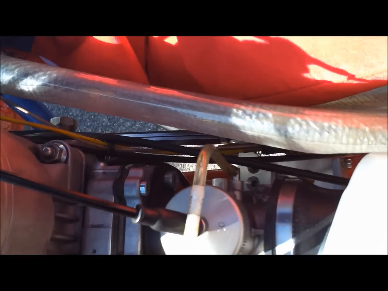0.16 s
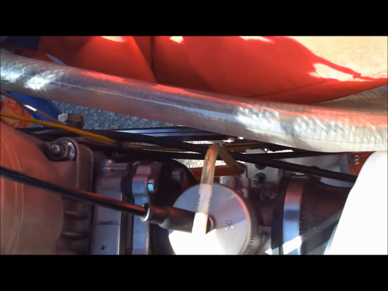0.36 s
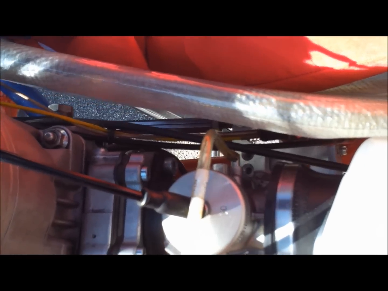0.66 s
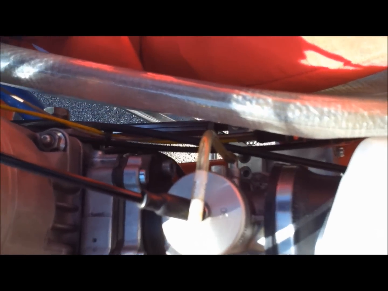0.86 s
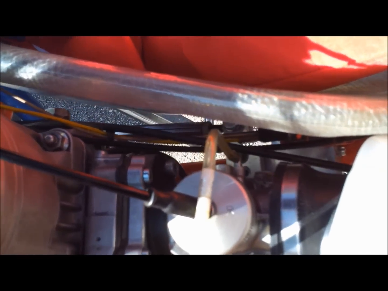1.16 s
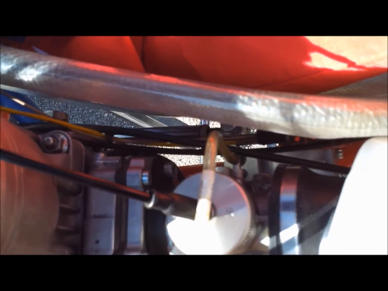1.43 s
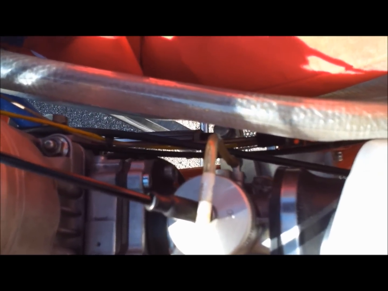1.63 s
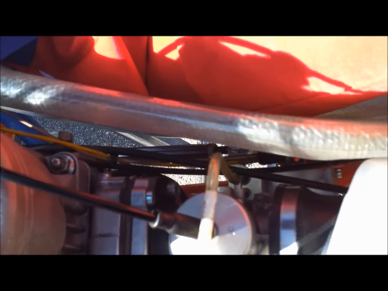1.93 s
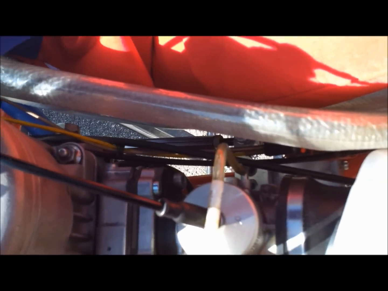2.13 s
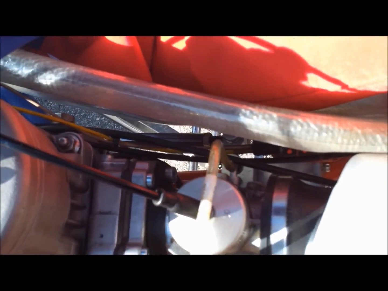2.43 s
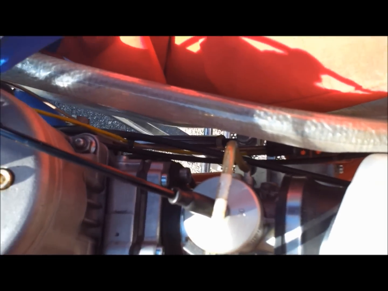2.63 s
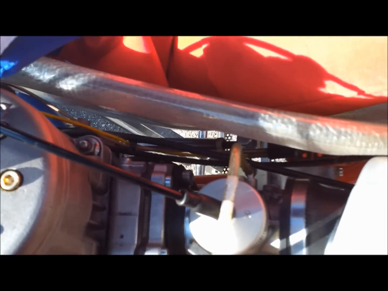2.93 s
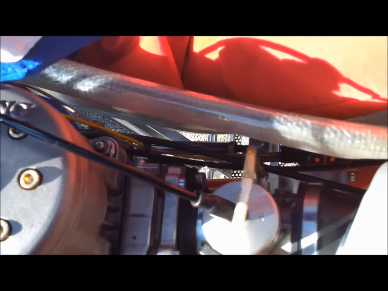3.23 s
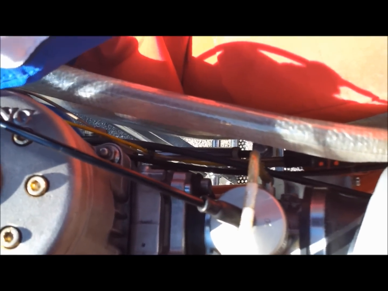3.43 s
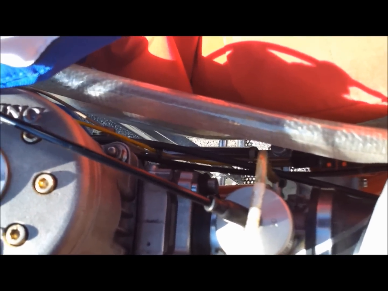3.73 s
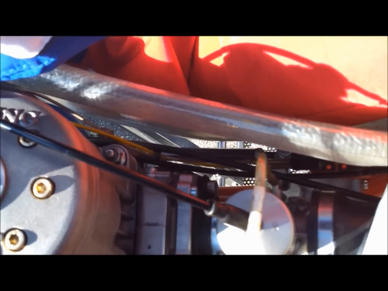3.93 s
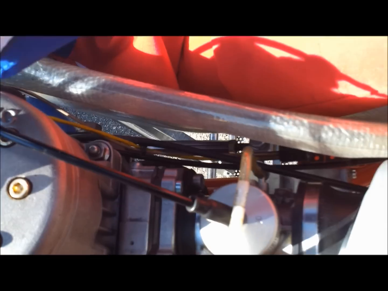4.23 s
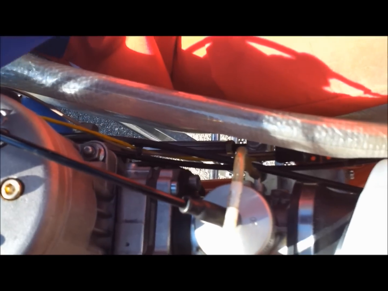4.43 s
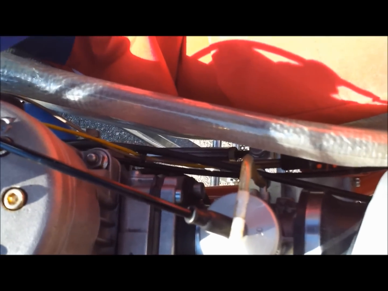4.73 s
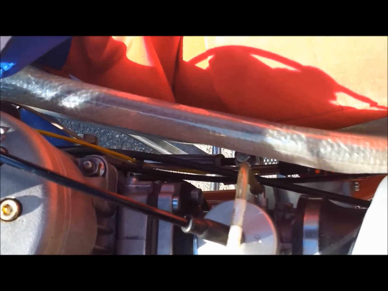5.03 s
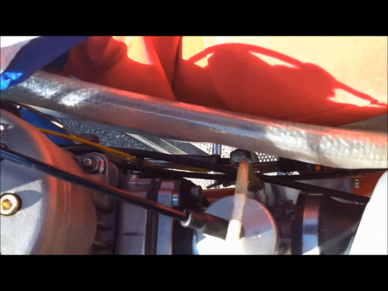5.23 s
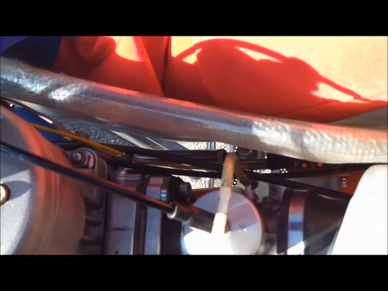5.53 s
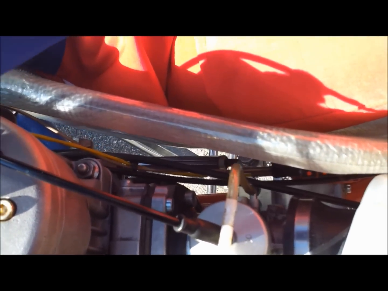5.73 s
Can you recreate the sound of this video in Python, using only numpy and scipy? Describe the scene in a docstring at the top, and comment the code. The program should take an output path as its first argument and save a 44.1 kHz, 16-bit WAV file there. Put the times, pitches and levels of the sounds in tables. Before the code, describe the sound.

With the engine off, a kart's metal shift linkage clacks and thumps, the chain ticks during a short roll, then harder clunks follow.

```python
"""A kart's shift linkage is worked with the engine off: bright metal clacks, made of uneven noise bursts
passed through resonances, some with ringing tones. Blows shake the tube frame into dull thumps.
The kart rolls a little: the chain ticks over its sprocket and the tyres rumble through the frame. A cable
creaks as it sticks and slips. Hiss and low wind lie underneath. All is heard from a microphone fixed to the
frame, and the loudest blows overload its input."""
import sys
import numpy as np
from scipy import signal
from scipy.fft import rfft, irfft
from scipy.io import wavfile
from scipy.ndimage import uniform_filter1d

SR = 44100
rng = np.random.default_rng(int(sys.argv[2]) if len(sys.argv) > 2 else 0)


def waveform_to_disk(signal):
    """Save audio, clipped to [-1, 1], as 16-bit WAV at the path in sys.argv[1]."""
    frames = np.transpose(np.atleast_2d(signal))
    scaled = np.clip(frames, -1, 1) * 32767
    samples = np.round(scaled).astype(np.int16)
    wavfile.write(sys.argv[1], SR, samples)


N = 258867  # length [samples]


def from_db(db):
    """Turn decibels into an amplitude factor."""
    return 10 ** (np.asarray(db) / 20)


def rms_one(x):
    """Scale a signal to an rms of 1."""
    return x / np.sqrt(np.mean(x ** 2) + 1e-20)


def in_time(rows):
    """Draw straight lines between rows; the first column is the time in seconds."""
    s, *columns = np.transpose(rows)
    return [np.interp(np.arange(N) / SR, s, column) for column in columns]


def drift(rate_hz):
    """Smoothed noise with an rms of 1: a random wander, faster at a higher rate."""
    r = np.exp(-2 * np.pi * rate_hz / SR)
    noise = rng.standard_normal(N + SR)
    return rms_one(signal.lfilter([1], [1, -2 * r, r * r], noise)[SR:])  # drop the filter's start


def coloured_noise(spectrum):
    """White noise shaped by a spectrum in dB, with an rms of 1."""
    hz = np.arange(N // 2 + 1) * SR / N + 1
    points = np.array(spectrum)
    shape = from_db(np.interp(np.log(hz), np.log(points[:, 0]), points[:, 1]))
    return rms_one(irfft(rfft(rng.standard_normal(N)) * shape, N))


def ring(x, hz, t60):
    """A unit click sets a sine of height 1 ringing; it falls by 60 dB in t60 seconds."""
    r, w = from_db(-60 / (t60 * SR)), 2 * np.pi * hz / SR
    return signal.lfilter([0, np.sin(w)], [1, -2 * r * np.cos(w), r * r], x + 1e-18)


def resonate(x, peaks):
    """Pass a sound through side-by-side resonances of alternating sign."""
    out = 0
    for k, (hz, width_hz, level_db) in enumerate(peaks):
        r = np.exp(-np.pi * width_hz / SR)
        feedback = [1, -2 * r * np.cos(2 * np.pi * hz / SR), r * r]
        band = signal.lfilter([(1 - r * r) / 2, 0, (r * r - 1) / 2], feedback, x)
        out = out + (-1) ** k * from_db(level_db) * band
    return out


def bursts(times, levels_db, t60s, rises_ms, tail_db, tail_t60):
    """Envelope of blows: a curved rise, an exponential fall and a weak slow tail as loose parts settle."""
    out, t = np.zeros(N + SR // 2), np.arange(SR // 2) / SR
    for s, level_db, t60, rise_ms in np.broadcast(times, levels_db, t60s, rises_ms):
        at = round(max(s, 0) * SR)
        rise = max(rise_ms, .1) / 1000
        after = np.maximum(t - rise, 0)
        fall = from_db(-60 * after / max(t60, .005))
        tail = from_db(tail_db - 60 * after / tail_t60)
        attack = np.sin(np.pi / 2 * np.minimum(t / rise, 1)) ** 2
        out[at:at + len(t)] += from_db(level_db) * (fall + tail) * attack
    return out[:N]


def chatter(treble_shape, middle_shape, treble_peaks, middle_peaks, grit_db, wander_db):
    """Metal on metal: a fast uneven rattle of contacts; the strength of each resonance wanders."""
    grit = rms_one(rng.standard_normal((2, N)) * from_db(grit_db * drift(740)))
    layers = [(grit[0], treble_shape, treble_peaks), (grit[1], middle_shape, middle_peaks)]
    out = 0
    for noise, shape, peaks in layers:
        scale = np.std(resonate(noise, peaks))
        for k, peak in enumerate(peaks):
            wandering = noise * shape * from_db(wander_db * drift(17.6))
            out = out + (-1) ** k * resonate(wandering, [peak]) / scale
    return out


def struck(times, levels_db, modes, spread_db):
    """Every blow strikes each ringing tone (mode) with a strength of its own."""
    at, out = (np.asarray(times) * SR).astype(int), 0
    luck = rng.standard_normal((len(at), len(modes)))
    for k, (hz, level_db, t60) in enumerate(modes):
        clicks = np.zeros(N)
        clicks[at] = from_db(levels_db + level_db + spread_db * luck[:, k])
        out = out + ring(clicks, hz, t60)
    return out


def through(modes, shake):
    """Noise under an envelope shakes a set of modes; a steady envelope of 1 gives an rms of 1."""
    noise = rng.standard_normal(N)
    steady = sum(from_db(db) * ring(noise, hz, t60) for hz, db, t60 in modes)
    shaken = sum(from_db(db) * ring(noise * shake, hz, t60) for hz, db, t60 in modes)
    return shaken / np.std(steady)


# Distance rolled, also used by the chain: (time [s], chain links passed [count])
DISTANCE_ROLLED = [(2.3107, 0), (2.4175, 3), (2.4763, 5), (2.5815, 9), (2.6314, 11), (2.693, 13),
                   (2.7376, 14), (2.8035, 16), (2.8235, 17), (2.9212, 20), (3.0639, 24), (3.1067, 25),
                   (3.1718, 27), (3.2533, 30), (3.2995, 32), (3.3504, 34), (3.4575, 38), (3.5384, 41),
                   (3.5708, 42), (3.6588, 45), (3.7207, 47)]
CRUISE_LINKS_PER_S = 33


def rolling_speed():
    """Rolling speed against cruising speed, in doublings: 0 when cruising, -4 at rest."""
    links, = in_time(DISTANCE_ROLLED)
    per_s = uniform_filter1d(np.gradient(links) * SR, size=SR // 8)
    return np.log2(np.maximum(per_s / CRUISE_LINKS_PER_S, 1 / 16))


# Colour of the low wind noise: (frequency [Hz], density [dB per Hz])
WIND_SPECTRUM = [(12, -36), (20, -12), (200, -16.5), (260, -32), (440, -120)]


def wind():
    """Low noise whose level wanders slowly."""
    return from_db(-50.5 + 3 * drift(5)) * coloured_noise(WIND_SPECTRUM)


# Colour of the hiss: (frequency [Hz], density [dB per Hz])
HISS_SPECTRUM = [(350, 8), (600, -1), (928, 2.5), (1080, -1.5), (1960, -4), (2820, -6.5), (4410, -8.5),
                 (6660, -3), (11200, -16.5), (11800, -4.5), (15400, -58), (22000, -120)]
# Steady hiss; hiss of the running chain at cruising speed and its growth per doubling of speed
AIR_DB, WHIRR_DB, WHIRR_DB_PER_DOUBLING = -48.5, -59.5, 24


def hiss(speed):
    """Flickering hiss: a steady part, and a part from the running chain that grows with speed."""
    flicker = from_db(1.3 * drift(12))
    whirr = from_db(WHIRR_DB + WHIRR_DB_PER_DOUBLING * speed)
    return (from_db(AIR_DB) + whirr) * flicker * coloured_noise(HISS_SPECTRUM)


# Pulls on the cable, levels before the resonances:
# (start [s], length [s], top level [dB], start against top [dB], slips at the top [per s])
CABLE_PULLS = [(0.649, 0.031, -33.5, -1.5, 185), (0.721, 0.19, -29, -4.5, 242),
               (3.375, .15, -34.5, -13, 600)]
# Resonances of the cable in its sleeve: (frequency [Hz], width [Hz], level [dB])
CABLE_RESONANCES = [(1040, 590, -9), (1810, 250, 1.5), (3020, 660, -0.5), (4800, 1900, -8),
                    (6860, 2200, -6)]
# Band that is let through: (low edge [Hz], high edge [Hz])
CABLE_BAND = [600, 8300]
# When in a pull the top comes [share of length]; level and slip rate at its end, against the top
CREAK_TOP_SHARE, CREAK_END_DB, CREAK_END_SLIPS = 0.43, -14.5, .3


def cable():
    """Stick and slip: uneven sharp pulses, each with a short scratchy tail, over rubbing noise."""
    t, out = np.arange(N) / SR, np.zeros(N)
    sizes, jitter, rub = from_db(3.1 * rng.standard_normal(N)), drift(80), rng.standard_normal(N)
    for start, length, top_db, start_db, top_per_s in CABLE_PULLS:
        end = start + length
        # the pull swells, then eases off
        level_db, per_s = in_time([(start, top_db + start_db, top_per_s),
                                   (start + CREAK_TOP_SHARE * length, top_db, top_per_s),
                                   (end, top_db + CREAK_END_DB, CREAK_END_SLIPS * top_per_s)])
        pulling = (t > start) * (t < end)
        slip_count = np.floor(np.cumsum(per_s * from_db(1.5 * jitter) / SR))
        slips = np.diff(slip_count, prepend=0) * sizes
        slips *= from_db(level_db) * np.sqrt(SR / per_s) * pulling  # slow slipping gets a boost
        tails = signal.lfilter([1], [1, -from_db(-60 / (.02 * SR))], slips + 1e-18)  # 20 ms to fall 60 dB
        sliding = from_db(level_db - 2.5) * per_s / top_per_s * pulling
        out += slips + (.09 * tails + sliding) * rub
    band = signal.butter(3, CABLE_BAND, "band", fs=SR, output="sos")
    return from_db(8.0) * signal.sosfilt(band, resonate(out, CABLE_RESONANCES))


# Blows into the frame, levels before the trims in frame():
# (time [s], level [dB], upper modes against level [dB], time for the shaking to fall 60 dB [s])
FRAME_BLOWS = [(0.013, -36.5, -1.5, 0.22), (0.302, -12, -30, 0.19), (0.479, 7, -10, 0.072),
               (0.565, -6.5, -12.5, 0.081), (0.594, -20, -15, 0.038), (1.214, -16.5, -5.5, 0.075),
               (1.668, -4.5, -10, 0.068), (1.826, -17.5, -18.5, 0.11), (1.871, -29, -27, .12),
               (1.996, -30, -61, 0.052), (2.376, -12.5, -28, 0.054), (2.577, -7, -21, 0.061),
               (2.646, -12.5, -35, 0.07), (2.796, -8, -19.5, 0.025), (2.965, -12.5, -23, 0.019),
               (3.143, -24.5, -23, 0.25), (3.312, -8.5, -22.5, 0.11), (3.455, -21.5, -32, 0.28),
               (3.551, -22, -35, 0.049), (3.687, -12, -35, 0.033), (3.751, -24.5, -13, 0.25),
               (3.865, -11, -24.5, 0.33), (3.917, -10, -4.5, 0.052), (3.963, 8, -6.5, 0.072),
               (4.047, -6.5, -21, 0.058), (4.197, -5, -19, 0.095), (4.246, -19, -17.5, 0.087),
               (4.522, 7.5, -11.5, 0.084), (4.641, -5, -21.5, 0.15), (4.667, -6, -15.5, 0.052),
               (4.946, -1, -10.5, 0.067), (5.169, 1, -13, 0.13), (5.221, 7.5, -9.5, 0.096),
               (5.293, 3, -7, 0.085), (5.312, 5.5, -21, 0.018), (5.342, -1, -18, 0.18),
               (5.449, -27, -14, 0.065), (5.851, -5.5, -8.5, 0.08)]
# Modes of the tubes, four lower ones first: (frequency [Hz], level [dB], time to fall 60 dB [s])
TUBE_MODES = [(238.5, -4, 0.061), (281, 0.5, 0.059), (326, -1, 0.03), (369, -11, 0.074), (546.6, -8, 0.13),
              (590, -3, 0.058), (724, 6.5, 0.033), (870, 11, 0.013), (953, 5, 0.037), (1122, -7, 0.061)]
# Bending of the whole frame: (frequency [Hz], level [dB], time to fall 60 dB [s])
SWAY_MODES = [(63, -21, 0.67), (138.1, -9.5, 0.36)]
TUBE_LOW_CUT_HZ = 151
# A blow springs back once, weaker and duller: delay, level change, further change of the upper modes
REBOUND_S, REBOUND_DB, REBOUND_UPPER_DB = 0.0338, -13, -14
# Drive of the rumble before trims: a constant part; a part at cruising speed and its growth
RUMBLE_REST_DB, RUMBLE_DB, RUMBLE_DB_PER_DOUBLING = -55.5, -48.5, 7


def frame(speed):
    """Blows and the road shake the tube frame; its modes turn the shaking into thumps and rumble."""
    rebounds = [(s + REBOUND_S, db + REBOUND_DB, upper_db + REBOUND_UPPER_DB, t60)
                for s, db, upper_db, t60 in FRAME_BLOWS[:-1]]  # the last blow has no rebound
    s, level_db, upper_db, t60 = np.transpose(FRAME_BLOWS + rebounds)
    rolling = from_db(RUMBLE_DB + RUMBLE_DB_PER_DOUBLING * speed)
    road = (from_db(RUMBLE_REST_DB) + rolling) * from_db(0.75 * drift(27.0))
    # the push builds before it is heard, so the bursts start a little early
    lower = bursts(s - .005, level_db - 15.5, t60, 9.7, tail_db=-15.0, tail_t60=0.36)
    upper = bursts(s - .002, level_db + upper_db - 2.5, t60, 7.2, tail_db=-32, tail_t60=0.6)
    lower_tubes = through(TUBE_MODES[:4], lower + road)
    upper_tubes = through(TUBE_MODES[4:], upper + from_db(-11.0) * road)
    # hard blows bend the frame more than in proportion
    sway = through(SWAY_MODES, from_db(-8.0) * lower ** 1.354 + from_db(-8.5) * road)
    low_cut = signal.butter(2, TUBE_LOW_CUT_HZ, "high", fs=SR, output="sos")
    return signal.sosfilt(low_cut, lower_tubes + upper_tubes) + sway


# Resonances of a link on the sprocket, middle band: (frequency [Hz], width [Hz], level [dB])
LINK_MIDDLE_RESONANCES = [(1620, 400, 3), (2570, 1630, -5.5), (4050, 47, 4.5)]
# The same for the treble: (frequency [Hz], width [Hz], level [dB])
LINK_TREBLE_RESONANCES = [(5830, 1870, -0.5), (6980, 770, 6), (7780, 1020, 2), (9200, 4500, -12)]
# Links that seat harder: (link number [count])
STIFF_LINK_NUMBERS = [3, 5, 9, 13, 25, 27, 30, 32, 34]
# Treble at cruising speed and middle against treble, both before trims; growth with speed
TICK_DB, TICK_MIDDLE_DB, TICK_DB_PER_DOUBLING = -27, -10.5, 6.5
TICK_SPREAD_DB, STIFF_DB = 1.2, 8.5  # chance from tick to tick; extra on a stiff link


def chain(speed):
    """Each link makes one short dry tick on the sprocket, louder at speed and on the stiff links."""
    times, passed = np.transpose(DISTANCE_ROLLED)
    link = np.arange(passed[-1] + 1)
    s = np.interp(link, passed, times)
    tick_speed = np.maximum(speed[(s * SR).astype(int)], -.4)  # slower ticks get no softer than this
    treble_db = TICK_DB + TICK_DB_PER_DOUBLING * tick_speed
    treble_db += STIFF_DB * np.isin(link, STIFF_LINK_NUMBERS)
    treble_db += TICK_SPREAD_DB * rng.standard_normal(len(s))
    treble = bursts(s, treble_db - 9.5, 0.031, 0.17, tail_db=-25, tail_t60=0.34)
    middle = bursts(s, treble_db + TICK_MIDDLE_DB - 6.5, 0.028, 0.95, tail_db=-18.5, tail_t60=0.16)
    return chatter(treble, middle, LINK_TREBLE_RESONANCES, LINK_MIDDLE_RESONANCES,
                   grit_db=1.5, wander_db=1.5)


# Blows that leave metal ringing, levels before each mode's own:
# (time [s], rod level [dB], gear casing level [dB], pivot pin level [dB])
RINGING_BLOWS = [(0.562, -70, -50, -27), (1.214, -70, -43, -55), (1.668, -62, -34.5, -52),
                 (3.922, -36, -28, -35), (4.036, -56, -44, -30), (4.2, -41, -56, -38),
                 (4.514, -32.5, -41, -15.5), (4.668, -44, -54, -26.5), (4.947, -60, -33, -34),
                 (5.329, -31.5, -44, -40), (5.443, -71, -49, -38)]
# Ringing of the shift rod: (frequency [Hz], level [dB], time to fall 60 dB [s])
ROD_MODES = [(2452, -3, 1.0)]
# The far end of the rod takes a moment to swing up: (frequency [Hz], width [Hz], level [dB])
ROD_SWING = [(2452, 14, 0)]
# Ringing of the gear casing: (frequency [Hz], level [dB], time to fall 60 dB [s])
CASING_MODES = [(2815, -3, .17), (2912, -7, .3), (3058, -4, .25), (3311, -4, .55), (3548, -4, .25),
                (4780, -7, .55), (5098, -9, .3), (5560, -7, .15)]
# Ringing of the pivot pin: (frequency [Hz], level [dB], time to fall 60 dB [s])
PIN_MODES = [(4100, -11, .1), (6035, -1, .1), (7450, -6, .08), (8300, -11, .1), (9500, -12, .08)]


def ringing_metal():
    """The rod, gear casing and pivot pin ring on after some of the blows."""
    s, rod_db, casing_db, pin_db = np.transpose(RINGING_BLOWS)
    rod = resonate(struck(s, rod_db, ROD_MODES, spread_db=1.0), ROD_SWING)
    casing = struck(s, casing_db, CASING_MODES, spread_db=2.0)
    pin = struck(s, pin_db, PIN_MODES, spread_db=1.0)
    return (rod + casing + pin) * from_db(1.5 * drift(11))  # loose joints make the ring waver


# Lever and gear dogs strike; the faint rows from 2.04 to 2.32 s are first ticks of the slack chain.
# Levels before the trims in linkage():
# (time [s], treble level [dB], middle against treble [dB], time for the chatter to fall 60 dB [s])
CLACKS_AND_SLACK_TICKS = [(0.0196, -15.5, 5.5, 0.029), (0.3088, -29, -4, 0.025), (0.4676, -8, -8, 0.21),
                          (0.563, -19, -19, 0.11), (0.597, -30, 7, 0.088), (0.6232, -27.5, -6, 0.11),
                          (1.039, -45.5, 19.5, 0.044), (1.2148, -6, -5, 0.027), (1.3049, -31, -14, 0.096),
                          (1.6674, 0.5, -5.5, 0.048), (1.8152, -19.5, -7.5, 0.032),
                          (1.826, -23.5, 6.5, 0.081), (1.845, -29, -7, 0.071), (1.8884, -13, -16, 0.051),
                          (1.9364, -47, -4, 0.028), (2.0417, -31, -4.5, 0.041), (2.062, -32.5, -4, .035),
                          (2.081, -36, -11, .035), (2.1407, -33, -1.5, 0.032), (2.203, -30, -32, .035),
                          (2.262, -36, -6, 0.039), (2.323, -34, -1.5, 0.021), (2.649, -22.5, -22, 0.1),
                          (2.683, -20, -5, 0.038), (3.0948, -42, -14, .035), (3.7629, -9.5, -16.5, 0.066),
                          (3.7914, -27, -8.5, 0.11), (3.8262, -25.5, 0, 0.069), (3.8637, -28, -13, 0.047),
                          (3.8875, -16, -2.5, 0.037), (3.918, 6, -11.5, 0.076), (3.9636, -7, -8.5, 0.23),
                          (4.035, -18, 1, 0.061), (4.1873, -23, -14.5, 0.29), (4.2768, -20.5, -7, 0.095),
                          (4.2937, -4, -14.5, 0.029), (4.3008, -.1, -35, 0.032), (4.4115, -38.5, 9, 0.019),
                          (4.5137, 3.5, -14, 0.078), (4.5444, -30, -5, 0.46), (4.653, -30, -24, 0.12),
                          (4.674, -25, -18, 0.13), (4.8242, -25.5, -7.5, 0.13), (4.8534, -36, 14.5, 0.032),
                          (4.9279, -11, 0.5, 0.12), (4.9455, -2, -3, 0.053), (5.038, -29.5, -5, 0.024),
                          (5.0665, -33.5, -1.5, 0.068), (5.1185, -34.5, 3.2, 0.23), (5.1613, 6, -9, 0.12),
                          (5.1774, -6.5, -1, 0.22), (5.215, -6, -6.5, 0.17), (5.2373, -9, -12, 0.15),
                          (5.276, -11.5, -17, 0.18), (5.3027, -8, -21, 0.11), (5.3299, 11, -17, 0.034),
                          (5.4419, -7.5, -4.5, 0.046), (5.7236, -30.5, -9, 0.065),
                          (5.751, -40.5, 14, 0.071), (5.8319, -10, 0.5, 0.057), (5.853, -14, 6.5, 0.071)]
# Dogs drag before they engage, level before the same trims: (time [s], treble level [dB])
DOG_DRAGS = [(3.910, -12.5), (3.955, -16.5), (5.150, -19)]
# Resonances of a clack, middle band: (frequency [Hz], width [Hz], level [dB])
CLACK_MIDDLE_RESONANCES = [(1107, 214, 0), (1642, 145, 2), (2460, 1090, -1), (2775, 750, 2.5),
                           (3200, 1360, -4)]
# The same for the treble: (frequency [Hz], width [Hz], level [dB])
CLACK_TREBLE_RESONANCES = [(5430, 720, 0), (5900, 195, 5), (6690, 580, 3), (7930, 810, 3),
                           (7680, 1800, 3.5), (9300, 4300, -23)]
CLACK_RISE_MS, DRAG_RISE_MS = 1.2, 6.4
DRAG_MIDDLE_DB, DRAG_T60_S = 2, 0.048  # middle against treble before trims; time to fall 60 dB


def linkage():
    """Metal strikes and drags on metal (with the slack chain's first ticks): chatter excites resonances."""
    clacks = [row + (CLACK_RISE_MS,) for row in CLACKS_AND_SLACK_TICKS]
    drags = [row + (DRAG_MIDDLE_DB, DRAG_T60_S, DRAG_RISE_MS) for row in DOG_DRAGS]
    s, treble_db, middle_db, t60, rise_ms = np.transpose(clacks + drags)
    treble = bursts(s, treble_db - 11.5, t60, rise_ms, tail_db=-30.5, tail_t60=0.36)
    middle = bursts(s, treble_db + middle_db - 7.5, t60, rise_ms, tail_db=-24, tail_t60=0.41)
    rings = ringing_metal()
    rattle = chatter(treble, middle, CLACK_TREBLE_RESONANCES, CLACK_MIDDLE_RESONANCES,
                     grit_db=3.0, wander_db=2.5)
    return rattle + rings


def scene():
    """Add up all the sources, as one channel."""
    speed = rolling_speed()
    background = hiss(speed) + wind()
    kart = linkage() + chain(speed) + frame(speed) + cable()
    return (background + kart)[None]


OVERLOAD = 0.85  # ceiling of the input [amplitude before the treble cut]
TREBLE_STOP_HZ = 12206.34  # from here up the sound is at least 40 dB down


def record(dry):
    """Peaks hit a hard ceiling with a small knee; then the highest treble is cut."""
    clipped = dry / (1 + np.abs(dry / OVERLOAD) ** 6) ** (1 / 6)
    treble_cut = signal.cheby2(12, 40, TREBLE_STOP_HZ, fs=SR, output="sos")
    return signal.sosfilt(treble_cut, clipped)


dry = scene()
out = record(dry)
waveform_to_disk(out)
```